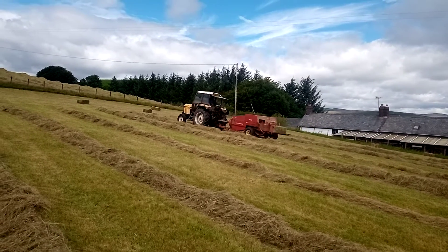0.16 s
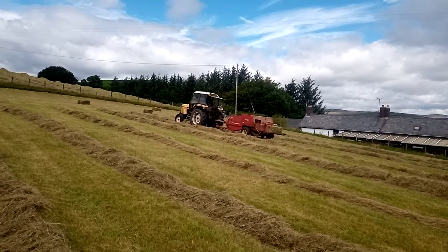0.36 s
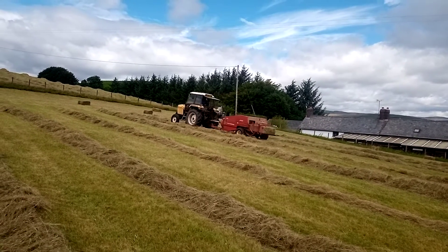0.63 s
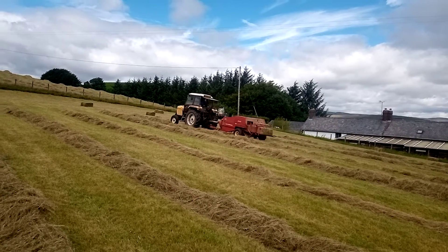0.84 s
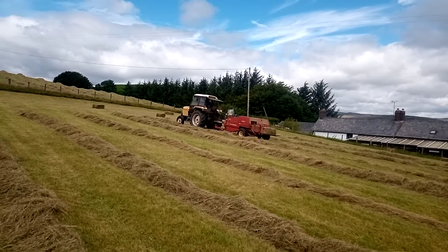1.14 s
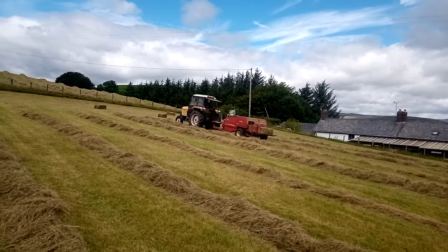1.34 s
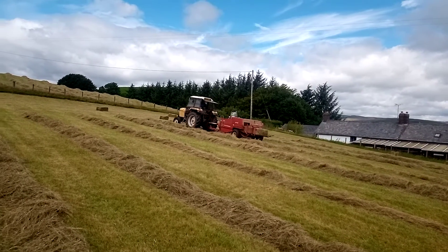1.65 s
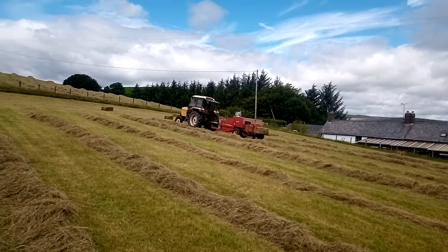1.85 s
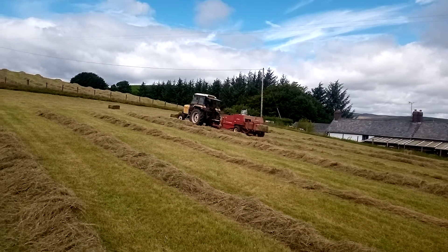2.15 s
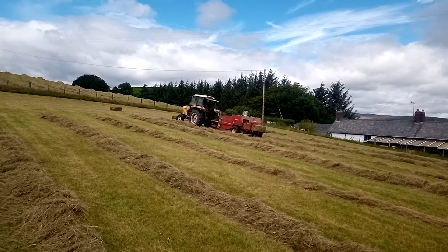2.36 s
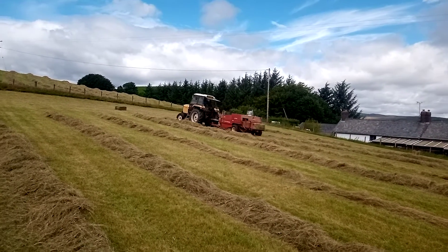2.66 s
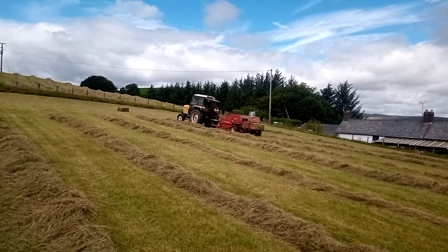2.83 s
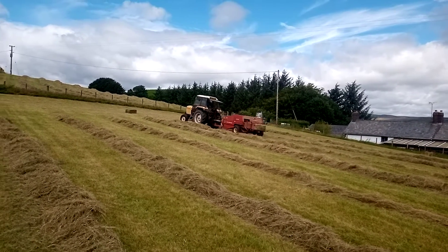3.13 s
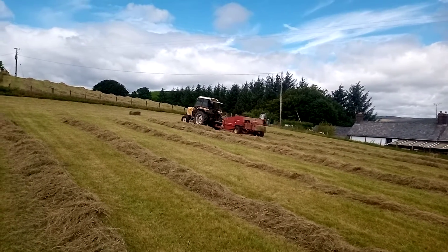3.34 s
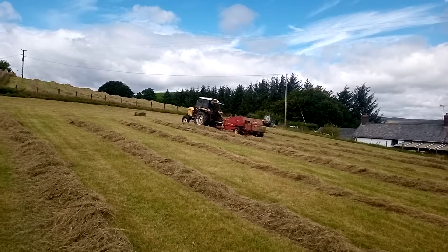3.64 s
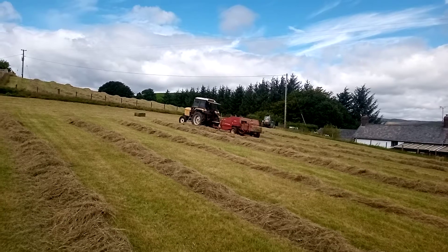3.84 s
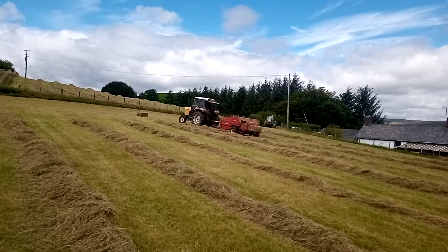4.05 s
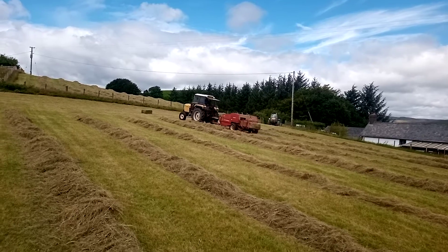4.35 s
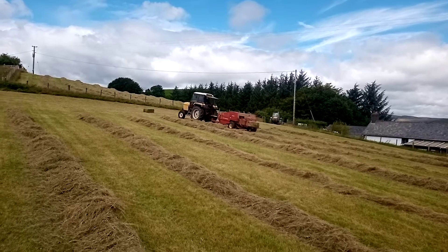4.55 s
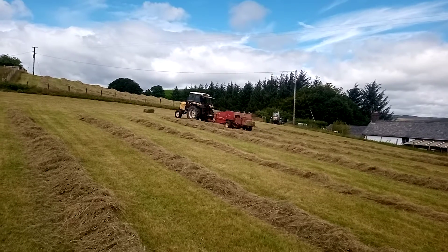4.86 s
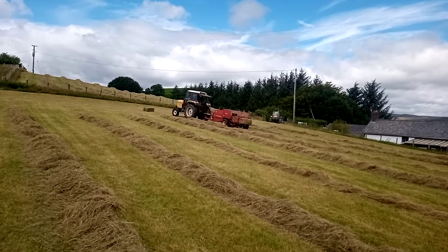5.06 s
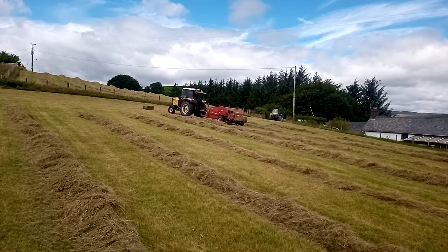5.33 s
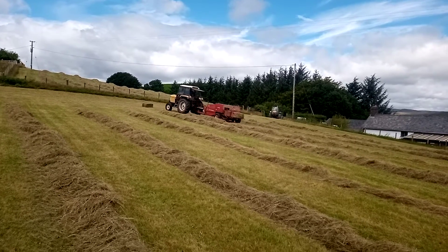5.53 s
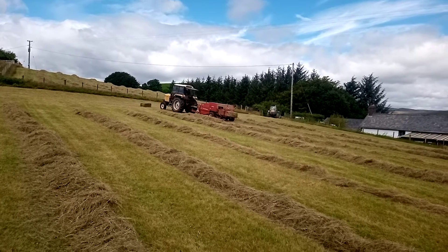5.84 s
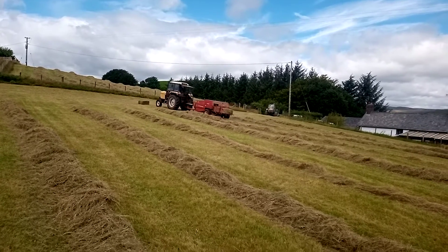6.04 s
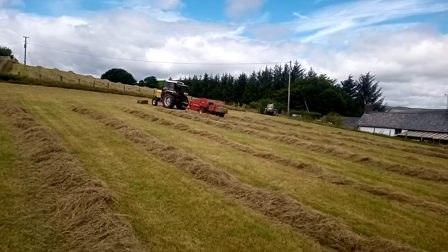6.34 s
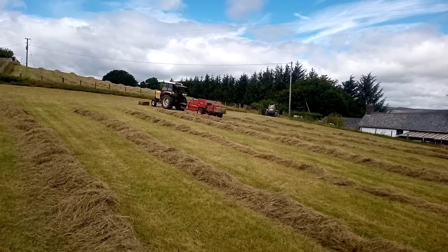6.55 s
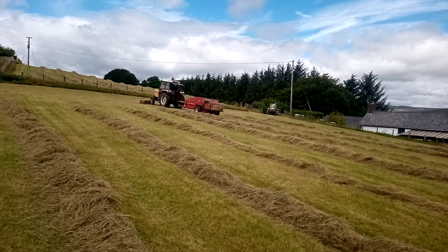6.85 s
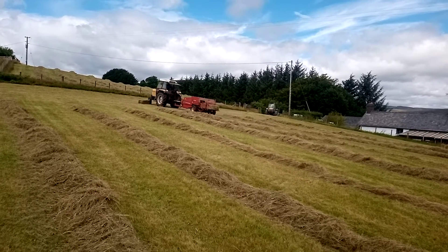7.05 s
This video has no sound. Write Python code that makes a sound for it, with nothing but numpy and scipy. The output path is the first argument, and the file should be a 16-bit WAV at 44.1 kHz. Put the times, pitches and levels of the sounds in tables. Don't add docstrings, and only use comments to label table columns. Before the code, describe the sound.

Diesel tractor hums steadily while its baler clanks about every three quarters of a second, metal rattling, hay hissing, wind later buffeting the microphone.

```python
import sys
import numpy as np
from scipy import signal
from scipy.fft import rfft, irfft
from scipy.io import wavfile
from scipy.ndimage import uniform_filter1d

SR = 44100
rng = np.random.default_rng(int(sys.argv[2]) if len(sys.argv) > 2 else 0)


def natural_amplitude(level_db):
    exponent = np.asarray(level_db, float) / 20
    return 10 ** exponent


def dump(signal):
    limited = np.clip(np.atleast_2d(signal).T, -1, 1)
    pcm = np.round(limited * 32767).astype(np.int16)
    wavfile.write(sys.argv[1], SR, pcm)


N = 317079
HZ = np.fft.rfftfreq(N, 1 / SR)
STROKE_S, FIRST_SLAM_S = 0.7345, 0.2255


def unit(x):
    return x / np.sqrt(np.mean(x ** 2))


def curves(table):
    s, *columns = np.transpose(table)
    return [np.interp(np.arange(N) / SR, s, c) for c in columns]


def ring(x, modes):
    gain = 0
    for k, (f, width, db) in enumerate(modes):
        gain = gain + (-1) ** k * natural_amplitude(db) * 1j * HZ * width / (f ** 2 - HZ ** 2 + 1j * HZ * width)
    return irfft(rfft(x) * gain, N)


def shade(x, spectrum):
    hz, db = np.transpose(spectrum)
    return irfft(rfft(x) * natural_amplitude(np.interp(np.log(HZ + 1), np.log(hz), db, -120, -120)), N)


def walk(rate):
    k = int(SR / rate)
    held = np.repeat(rng.standard_normal(N // 20), k)[:N]
    return unit(uniform_filter1d(uniform_filter1d(held, k), k))


def noise():
    return rng.standard_normal(N)


def bursts(times, dbs, decays_ms):
    out, t = np.zeros(N + SR), np.arange(int(0.15 * SR)) / SR
    for s, db, ms in zip(times, dbs, decays_ms):
        start = max(int((s - 0.003) * SR), 0)
        out[start:start + len(t)] += natural_amplitude(db) * (1 - np.exp(-t / 0.00098)) * np.exp(-1000 * t / ms)
    return out[:N]


def humps(times, heights, half_s):
    t, out = np.arange(N) / SR, np.zeros(N)
    for s, height, half in np.broadcast(times, heights, half_s):
        a, b = np.clip([int((s - 3 * half) * SR), int((s + 3 * half) * SR)], 0, N)
        out[a:b] += height * np.exp(-((t[a:b] - s) / half) ** 2)
    return out


def grains(table, rise_ms, decay_ms):
    before = 882
    out, ms = np.zeros(N + SR), np.arange(-before, 1764) * 1000 / SR
    shape = np.where(ms < 0, np.exp(-(ms / rise_ms) ** 2), np.exp(-np.abs(ms) / decay_ms))
    for (s, db, hz), turn in zip(table, rng.random(len(table))):
        start = int(s * SR) - before
        out[start:start + len(ms)] += natural_amplitude(db) * shape * np.cos(2 * np.pi * (hz * ms / 1000 + turn))
    return out[:N]


# [t/s, steady flow level/dB, slow eddies level/dB]
WIND_FLOW = [(0, -33.5, -32.5), (.35, -37, -34.5), (.6, -38.5, -38.5), (1.1, -37, -38.5), (1.7, -42, -41.5),
             (2, -34.5, -44), (2.4, -37, -38), (2.65, -36.5, -35), (3.05, -42, -37), (3.6, -36, -36),
             (4.45, -42, -39.5), (4.8, -38.5, -35), (5.22, -39.5, -45), (5.3, -26.5, -29.5),
             (5.8, -27, -30), (6.68, -29, -30), (6.82, -35.5, -35), (7.19, -32, -33)]
# [f/Hz, level/dB per Hz]
SLOW_EDDIES_COLOUR = [(20, -42), (35, -26.5), (50, -11.5), (65, -4), (95, -1.5), (120, 1.5), (150, -18)]
GUST_COLOUR = [(90, -23), (115, -7.5), (150, 4.5), (200, 1.5), (270, -5), (380, -37.5)]
SHARP_EDDIES_COLOUR = [(200, -14.5), (300, 0), (400, -8), (550, -14), (800, -22), (1300, -32.5),
                       (2000, -32)]
# [t/s, peak level/dB, half length/ms, sharp eddies over the puff/dB]
WIND_PUFFS = [(.07, -36, 14, -4), (.115, -26, 9.8, -16), (.255, -26.5, 22, -1.5), (0.319, -31.5, 22, -12),
              (.51, -38.5, 33, -4.5), (.6, -49.5, 35, 6.5), (1.68, -48, 62, -1), (4.66, -39, 18, -3),
              (0.942, -39, 20, -15), (1.899, -53, 59, -1), (2.03, -37, 25, -36), (2.112, -32.5, 25, -9),
              (2.7, -39, 37, -25), (3.164, -28, 19, -10.5), (3.27, -50, 18, 3), (3.621, -43.5, 73, -1.5),
              (4.04, -31, 5.5, -22), (4.601, -37, 12, -19), (4.721, -29, 21, -5.5), (4.79, -35, 31, -6),
              (4.89, -37.5, 52, -6), (5.04, -38.5, 25.6, -12), (5.145, -28, 21, -3), (6.937, -25.5, 16, -6),
              (7.07, -33.5, 15, -14), (7.14, -41, 41, -2)]
# [t/s, peak level/dB, half length/ms, sharp eddies over the surge/dB]
GUST_SURGES = [(5.267, -17, 5.8, -14), (5.352, -42, 75, 16), (5.49, -33, 33, 7), (5.57, -30.5, 8.3, 3),
               (5.66, -43, 19, 4), (5.75, -30, 100, 1.5), (5.92, -33, 17, -10), (6.001, -29.5, 59, 4),
               (6.16, -25, 21, -10.5), (6.28, -36, 50, 2.5), (6.42, -34.5, 58, -6), (6.53, -25, 20, -14),
               (6.61, -44, 19, -4), (6.69, -28.5, 26, -13)]
# [t/s, peak level/dB, half length/ms]
PORT_THUMPS = [(.19, -43, 15), (.295, -40, 22), (.62, -36, 23), (2.169, -25, 24), (2.66, -33, 26),
               (3.15, -47, 14), (4.73, -34.5, 19), (4.92, -36, 22), (5.601, -32.5, 73), (5.721, -31, 45),
               (5.91, -31, 13), (6.52, -35, 39)]
# [t/s, peak level/dB, f/Hz]
PORT_FLICKS = [(5.2946, -28, 400), (5.3282, -22.7, 570), (5.3727, -19.3, 384), (5.3935, -15, 367),
               (5.4212, -24, 410), (5.4627, -13.5, 380), (5.4855, -26, 420), (5.4982, -22, 380),
               (5.5185, -27, 400), (5.5361, -19.5, 426), (5.568, -16.5, 340), (5.5904, -23, 367),
               (5.6608, -16.5, 370), (5.6864, -22.7, 430), (5.6991, -25, 408), (5.7141, -21, 372),
               (5.7401, -26, 377), (5.7893, -31, 374), (5.826, -29, 430), (5.8571, -27, 362),
               (5.916, -29, 388), (5.9435, -24, 406), (5.9625, -20, 470), (5.9886, -22, 430),
               (6.0008, -15, 380), (6.0241, -21.1, 376), (6.0513, -30, 430), (6.134, -27.1, 440),
               (6.162, -21, 407), (6.2412, -35, 377), (6.2547, -28, 740), (6.278, -29, 534),
               (6.3016, -29, 740), (6.3362, -23, 373), (6.414, -33, 410), (6.4346, -20, 354),
               (6.452, -20.5, 370), (6.501, -36, 370), (6.5205, -27.5, 437), (6.5331, -21.5, 390),
               (6.5651, -28, 382), (6.5814, -27, 400), (6.601, -29.5, 400), (6.6659, -20.5, 377),
               (6.704, -21.5, 416)]


def wind():
    flow_db, slow_db = curves(WIND_FLOW)
    s, db, ms, puff_sharp_db = np.transpose(WIND_PUFFS + GUST_SURGES)
    thump_s, thump_db, thump_ms = np.transpose(PORT_THUMPS)
    puffs = humps(s, natural_amplitude(db), ms / 1000)
    big = natural_amplitude(slow_db) + natural_amplitude(-12) * puffs + humps(thump_s, natural_amplitude(thump_db), thump_ms / 1000)
    sharp_db = flow_db - 14.5 + 0.77 * (flow_db + 38)
    in_gust = (s > 5.2) * (s < 6.8)
    small = natural_amplitude(sharp_db) + humps(s, natural_amplitude(db + puff_sharp_db - 2.8 * in_gust), ms / 1000)
    flutter = walk(22)
    slow = big * natural_amplitude(0.44 * flutter) * unit(shade(noise(), SLOW_EDDIES_COLOUR))
    middle_level = (natural_amplitude(flow_db) + puffs) * natural_amplitude(-1.5 + 0.59 * flutter + 0.5 * walk(35))
    middle = middle_level * unit(shade(noise(), GUST_COLOUR))
    sharp_level = small * natural_amplitude(-1.5 + 0.8 * flutter + 2.0 * walk(60))
    sharp = sharp_level * unit(shade(noise(), SHARP_EDDIES_COLOUR))
    snaps = noise() * (rng.random(N) < 60 / SR) * natural_amplitude(4.0 * rng.exponential(size=N))
    snaps = unit(shade(snaps, [(300, -17), (500, -11), (900, -6), (1500, -12), (2200, -43)]))
    snaps = (small / natural_amplitude(-18)) ** 2 * natural_amplitude(-39) * snaps
    flicks = natural_amplitude(-2) * grains(PORT_FLICKS, rise_ms=4.2, decay_ms=3.2)
    return slow + middle + sharp + snaps + flicks


# [t/s, peak level/dB, length/ms]
PORT_POPS = [
    (5.325, -16, 0.4),
    (5.372, -12, 0.49),
    (5.567, -16, 0.48),
    (5.915, -10, 1.6),
    (5.962, -13, 0.66),
    (5.986, -28, 0.99),
]


def pops():
    t, out = np.arange(N) / SR, 0
    for s, db, ms in PORT_POPS:
        x = np.clip(1000 * (t - s) / ms, -9, 9)
        out = out + natural_amplitude(db - 4) * (1 - 2 * x ** 2) * np.exp(-x ** 2)
    return out


# [t/s, firing rate f/Hz, knock level/dB]
ENGINE_PACE = [(0, 63.38, -43), (1.6, 63.1, -46), (2.6, 62.78, -43), (3.4, 62.9, -44.5), (4.2, 63.12, -45),
               (4.8, 62.45, -45.5), (5.5, 62.9, -47.5), (6.2, 63.3, -46), (7.19, 62.7, -44)]
# [multiple of firing rate, level/dB rms]
EXHAUST_ORDERS = [(1, -49), (3.5, -52.5), (8.5, -71), (9.5, -70), (10, -58.5), (10.5, -68), (11, -63),
                  (11.5, -66.5), (12, -58), (13, -61), (14, -60), (15, -58.5), (15.5, -60.5), (16, -67),
                  (17, -64)]
# [t/s, level/dB rms]
DRONE_SWELL = [(0, -35.5), (.5, -34), (1.3, -36.5), (1.8, -29), (1.92, -42.5), (2, -34.5), (2.4, -33),
               (2.55, -38.5), (2.7, -33.5), (3.05, -36), (3.27, -49), (3.4, -34), (3.79, -43.5),
               (3.9, -33.5), (4.2, -35), (4.3, -45.5), (4.6, -35), (7.19, -36.5)]
# [f/Hz, width/Hz, level/dB]
BLOCK_MODES = [(635, 136, 4.5), (742, 104, 8.5), (997, 98, 6.5), (1437, 41, -1.5)]


def engine():
    hz, knock_db = curves(ENGINE_PACE)
    stroke = (np.arange(N) / SR - FIRST_SLAM_S) / STROKE_S
    drag = 0.0039 * np.cos(2 * np.pi * (stroke + 0.13))
    turns = np.cumsum(hz * (1 + drag + 0.00294 * walk(6))) / SR
    hum = 0
    for k, db in EXHAUST_ORDERS:
        hum = hum + natural_amplitude(db + 2.1 * walk(9)) * np.sqrt(2) * np.sin(2 * np.pi * k * turns)
    drone_level = natural_amplitude(curves(DRONE_SWELL)[0] - 1 + 0.74 * walk(9))
    hum = hum + drone_level * np.sqrt(2) * np.sin(4 * np.pi * turns)
    cycle = turns % 1
    strength = natural_amplitude(1.84 * rng.standard_normal(N // 100))[turns.astype(int)]
    firing = np.diff(np.floor(turns), prepend=0) * strength
    blast = strength * (1.4 + np.exp(-cycle / 0.95)) * noise()
    knock = 0.53 * unit(ring(firing, BLOCK_MODES)) + unit(ring(blast, BLOCK_MODES))
    return hum + natural_amplitude(knock_db + 1.6 * walk(9.3)) * unit(knock), cycle


# [t/s after the slam, half length/s, extra tinkle/dB, extra hiss/dB]
STROKE_SWEEPS = [
    (0.002, 0.054, -4.5, 13),
    (0.234, 0.069, 0.5, 9),
    (0.393, 0.018, 3, 5),
    (.585, 0.033, 1, 4),
]
# [slam/dB, feed/dB, return/dB, reach/dB]
SWEEP_LOADS = [(0, 0, 0, 2), (5, 6, 4.5, 1), (5, 4, 1, 1), (5, 3.5, 3.5, 1), (5, 6, 1, 1),
               (5, 4.5, 2.5, 1.5), (6, 5.5, 0, 2.5), (5, 3.5, 3.5, 3), (6, 9, 6.5, 2), (7, 6.5, 5, 1),
               (5.001, 6, 1, 1)]


def shudders():
    slam_s = np.transpose(PLUNGER_STROKES)[0]
    start_s = np.r_[slam_s[0] - STROKE_S, slam_s]
    rattle_db, tinkle_db, hiss_db = 0, 0, 0
    for (after_s, half_s, tinkle, hiss), load_db in zip(STROKE_SWEEPS, np.transpose(SWEEP_LOADS)):
        rattle_db = rattle_db + humps(start_s + after_s, load_db, half_s)
        swell = humps(start_s + after_s, 0.95, half_s)
        tinkle_db = tinkle_db + tinkle * swell
        hiss_db = hiss_db + hiss * swell
    return rattle_db, tinkle_db, hiss_db


# [t/s, peak level/dB, decay/ms]
HAY_RAKES = [(0.0453, -53, 8.2), (0.0802, -55, 9), (0.189, -56, 9), (0.2194, -48, 9.9), (0.3561, -56, 9),
             (0.4145, -53, 10), (0.5092, -59, 9), (0.603, -45, 9), (0.6504, -52, 9), (0.7696, -54, 9),
             (0.7976, -51, 9.9), (0.9153, -59, 9), (0.9602, -46, 9), (1.0136, -51, 9), (1.0595, -65, 9),
             (1.1039, -56, 9), (1.3808, -62, 9), (1.4411, -64, 8.1), (1.4591, -62, 7.7), (1.5683, -62, 9),
             (1.6511, -60, 9), (1.6906, -48, 9), (1.707, -52, 9), (1.8866, -57, 9), (1.9066, -56, 9),
             (1.9584, -63, 4), (2.0592, -59, 8), (2.429, -55, 3), (2.4688, -58, 9), (2.6304, -59, 9),
             (2.7257, -61, 9), (2.83, -57, 14), (2.8434, -58, 9), (3.123, -57, 26), (3.1423, -53, 9),
             (3.1647, -52, 9), (3.2241, -53, 9), (3.2929, -64, 9), (3.2949, -60, 9), (3.3628, -62, 9),
             (3.3727, -62, 9), (3.9005, -60, 8.2), (3.9065, -57, 9), (4.6254, -52, 9), (4.6483, -57, 9),
             (4.6818, -61, 9), (5.3792, -58, 9), (5.3802, -56, 9), (5.4121, -63, 9), (5.4365, -55, 9),
             (5.5223, -66, 9), (5.7428, -50, 9), (5.8082, -62, 9), (6.101, -57, 9), (6.129, -55, 8.4),
             (6.4572, -63, 9), (6.4707, -60, 15), (6.8413, -62, 8.1), (6.8663, -60, 9), (7.1716, -59, 9)]


def hay():
    floor_db = curves(RUNNING_GEAR)[1] + shudders()[2]
    s, db, decay_ms = np.transpose(HAY_RAKES)
    swish = bursts(s + 0.002, db - 10, decay_ms)
    swish = swish + humps(s + decay_ms / 1000, natural_amplitude(db - 15), decay_ms / 1500)
    level = natural_amplitude(3.0 * walk(70)) * natural_amplitude(floor_db - 1.5 + 2.0 * walk(20)) + swish * natural_amplitude(2.4 * walk(200))
    crackle = noise() * natural_amplitude(2.5 * np.minimum(rng.exponential(size=N), 6))
    stalk_colour = [(12500, -36), (13900, -25), (14500, -7), (15200, -9), (16000, -2)]
    tine_colour = [(7000, -30), (8500, -1), (11000, -4), (12500, -11), (14000, -19)]
    stalks = level * unit(shade(crackle, stalk_colour))
    return stalks + natural_amplitude(-3) * swish * unit(shade(crackle, tine_colour))


def loose_parts(x, count, width_hz):
    hz = 1600 * 2 ** (3.2 * (np.arange(count) + rng.random(count)) / count)
    return unit(ring(x, [(f, width_hz * f / 3000, 0) for f in hz]))


# [t/s, steady rattle level/dB, hay hiss level/dB]
RUNNING_GEAR = [(0, -43.5, -72), (.6, -45, -72), (1.1, -44.5, -79), (1.5, -44, -77), (2.2, -44.5, -79),
                (2.6, -44, -76), (3, -44.5, -82), (3.6, -46, -84), (4, -45, -81), (4.45, -45, -80),
                (4.9, -45.5, -83), (5.3, -47, -86), (5.95, -50, -91), (6.25, -46.5, -84), (6.7, -47.5, -89),
                (6.83, -47, -88), (6.9, -43, -86), (7.19, -46.5, -80)]
# [f/Hz, level/dB per Hz]
SHEET_COLOUR = [(1000, -16), (1500, -11.5), (1750, 2.5), (2000, -3), (2400, -6.5), (2750, -7), (3300, -12),
                (3750, -11), (4400, -17), (6300, -14.5), (7300, -21), (8300, -33), (10700, -36),
                (13000, -65)]


def gear(cycle):
    swell_db, extra_tinkle_db, _ = shudders()
    rattle_db = curves(RUNNING_GEAR)[0] + swell_db
    tinkle_db = -25 + extra_tinkle_db
    ticks = unit(noise() * natural_amplitude(2.0 * np.minimum(rng.exponential(size=N), 6)))
    shake = (1 + 0.5 * np.exp(-cycle / 0.5)) * natural_amplitude(0.77 * walk(25) + 1.1 * walk(90))
    jingle = loose_parts(noise() * (rng.random(N) < 900 / SR), count=42, width_hz=42)
    metal = shade(shake * (ticks + 0.28 * jingle), SHEET_COLOUR)
    chime = shade(shake * (ticks + 0.57 * jingle), SHEET_COLOUR)
    top = [(20, -60), (7000, -60), (8000, 0), (20000, 0)]
    rattle = unit(metal - shade(metal, top))
    tinkle = natural_amplitude(tinkle_db + 1.3 * walk(30)) * unit(shade(chime, top))
    return natural_amplitude(rattle_db) * (rattle + tinkle)


# [t/s, f/Hz, level/dB, t60/s]
TINE_PINGS = [
    (4.628, 6050, -52, .08),
    (4.674, 6050, -39, 0.11),
    (4.674, 5450, -41, 0.06),
    (6.46, 3700, -44, 0.2),
]


def pings():
    t, out = np.arange(N) / SR, 0
    for s, hz, db, t60 in TINE_PINGS:
        rise = np.clip((t - s) / 0.0065, 0, 1)
        out = out + natural_amplitude(db - 60 * np.abs(t - s) / t60) * rise * np.sin(2 * np.pi * hz * t)
    return natural_amplitude(2.5 * walk(150)) * out


# [slam t/s, slam level/dB, bounce after/ms, bounce level/dB, bounce decay/ms]
PLUNGER_STROKES = [
    (0.2254, -19, 13, -17.5, 18),
    (0.96, -16.5, 17.3, -27, 8.9),
    (1.693, -18, 19, -17.5, 25),
    (2.428, -10, 46, -24, 8.5),
    (3.167, -14, 48, -27, 14),
    (3.9, -21, 26, -31, 11),
    (4.6267, -12, 25, -21, 12),
    (5.371, -21, 6.7, -15, 5.5),
    (6.102, -15.5, 9.8, -26, 38),
    (6.8424, -19, 22, -20, 19.6),
]
# [t/s, peak level/dB, brightness/dB, decay/ms]
LINKAGE_KNOCKS = [(0.2624, -46, -14, 15), (2.4444, -37, -22, 7.8), (2.58, -24, -21, 11),
                  (3.187, -44, -21, 13), (5.91, -33, -12.5, 20), (0.604, -29, -4, 19),
                  (0.6294, -34, -16, 31), (1.3578, -31, -11, 38), (1.813, -31.5, -12, 110),
                  (1.8806, -29, -15, 31), (2.61, -47, -2, 11), (3.14, -30.5, -13, 42),
                  (3.2988, -27.5, -16, 16), (3.369, -23, -15, 6.5), (3.5775, -30.5, -12, 30),
                  (4.0124, -30.5, -16.5, 54), (4.296, -32, -8.5, 32), (4.672, -26, -13, 5.8),
                  (5.509, -22, -18, 7.8), (5.5523, -44, -10, 59), (5.745, -45, 4, 29),
                  (6.459, -33.5, -8, 117), (6.888, -39, -19, 7.1)]
# [t/s, peak level/dB, ring f/Hz]
METAL_CONTACTS = [(0.2242, -33.4, 1810), (0.2306, -29.2, 2040), (0.2423, -27.3, 1980),
                  (0.2469, -25.1, 2660), (0.2645, -30.2, 1830), (0.271, -33.2, 2630), (0.6098, -32.5, 2690),
                  (0.6237, -35.3, 1950), (0.6294, -34.8, 3310), (0.6533, -35.9, 1690),
                  (0.6578, -36.3, 2720), (0.9627, -25.1, 1910), (0.9671, -29.7, 1900), (0.975, -28.4, 2050),
                  (0.9803, -29.6, 2010), (0.985, -31.1, 1760), (0.9912, -33.6, 1980), (1.0018, -33.2, 2010),
                  (1.6965, -23.5, 1940), (1.7078, -27.3, 3200), (1.7185, -21.8, 2020),
                  (1.7407, -33.8, 1940), (2.4319, -23.2, 1940), (2.437, -26.5, 1820), (2.4438, -28.5, 1880),
                  (2.451, -28.6, 1830), (2.4609, -35.3, 2170), (2.4652, -27.8, 1850), (3.1692, -22.2, 1920),
                  (3.1797, -30.0, 1940), (3.1844, -28.4, 2140), (3.1994, -31.2, 1990),
                  (3.2071, -29.2, 1930), (3.9027, -25.5, 1910), (3.9188, -23.8, 2020),
                  (3.9287, -32.4, 1910), (3.9329, -33.9, 2020), (3.9398, -34.0, 1910),
                  (3.9439, -34.3, 2010), (3.9503, -33.0, 1980), (4.6287, -26.2, 2710),
                  (4.6414, -31.0, 1910), (4.6519, -30.4, 1910), (4.6754, -31.3, 1840),
                  (5.3722, -30.9, 2000), (5.381, -31.7, 1810), (5.3879, -32.3, 2490), (5.3954, -32.7, 2090),
                  (5.4066, -34.1, 1980), (6.0977, -35.0, 2620), (6.1052, -26.8, 1820),
                  (6.1173, -24.7, 1950), (6.1214, -24.8, 2620), (6.1261, -28.5, 1840),
                  (6.1361, -31.5, 2310), (6.8454, -26.6, 2640), (6.8693, -25.6, 1800),
                  (6.8814, -28.9, 2500), (6.8862, -34.1, 2470), (6.893, -28.9, 2050)]
# [f/Hz, width/Hz, level/dB]
CASE_MODES = [(1739, 22, 23), (1990, 350, 5.5), (2860, 245, 11), (3330, 70, 5), (3700, 450, 2),
              (4550, 320, -1), (5450, 510, -8), (6050, 59, 3), (6600, 580, -1.5), (7200, 540, -7),
              (9060, 3100, -21)]


def plunger():
    slams = [(s, db - 7.5, -21, 12) for s, db, *_ in PLUNGER_STROKES]
    bounces = [(s + ms / 1000, db - 8, -16, decay) for s, _, ms, db, decay in PLUNGER_STROKES]
    s, db, bright_db, decay_ms = np.transpose(slams + bounces + LINKAGE_KNOCKS)
    low = [m for m in CASE_MODES if m[0] <= 4000]
    high = [m for m in CASE_MODES if m[0] > 4000]
    grit = noise() * natural_amplitude(1.5 * walk(500))
    blows = np.zeros(N)
    blows[((s[:len(slams)] - 0.001) * SR).astype(int)] = natural_amplitude(16)
    contact_s, contact_db, _ = np.transpose(METAL_CONTACTS)
    crunch = humps(contact_s, natural_amplitude(contact_db + 1.5), 0.0032)

    def struck(level, modes):
        return ring(level * (grit + blows), modes) / np.std(ring(grit, modes))

    body = struck(bursts(s, db, decay_ms) + crunch, low)
    edge = struck(bursts(s, db + bright_db, decay_ms) + natural_amplitude(-19) * crunch, high)
    contacts = natural_amplitude(-5) * grains(METAL_CONTACTS, rise_ms=1.6, decay_ms=3.2)
    return contacts, natural_amplitude(-11) * body + natural_amplitude(-5.5) * edge


def near_echo(x):
    delay_s, share, top_hz = 0.001716, 0.46, 7000
    share = share / (1 + (HZ / top_hz) ** 2)
    return irfft(rfft(x) * (1 - share * np.exp(-2j * np.pi * HZ * delay_s)), N)


def scene():
    motor, cycle = engine()
    contacts, clatter = plunger()
    gusts = 0.4 * np.tanh((wind() + pops()) / 0.4)
    machine = near_echo(gear(cycle) + clatter)
    return (motor + machine + contacts + pings() + hay() + gusts)[None]


def top_cut(x):
    return signal.sosfilt(signal.butter(12, 16930, fs=SR, output="sos"), x)


# [f/Hz, level/dB]
MIC_RESPONSE = [(20, 0), (9500, 0), (12500, -4), (13800, -4), (14500, 0), (15700, 0), (15800, -18),
                (15840, -70)]


def record(dry):
    mix = shade(dry[0], MIC_RESPONSE)[None]
    return top_cut(mix)


dry = scene()
out = record(dry)
dump(out)
```